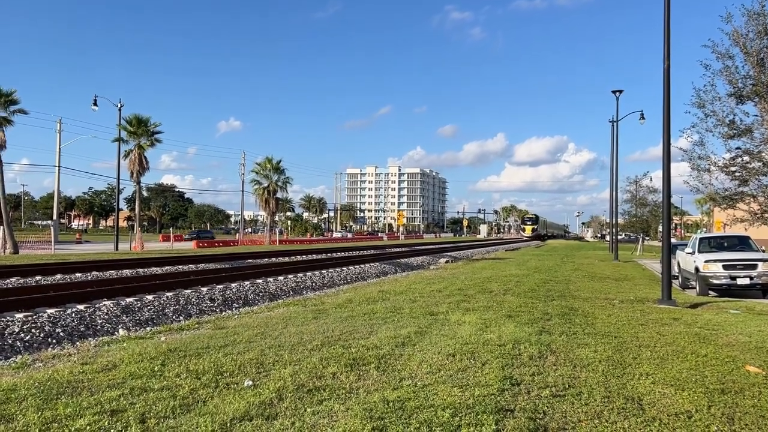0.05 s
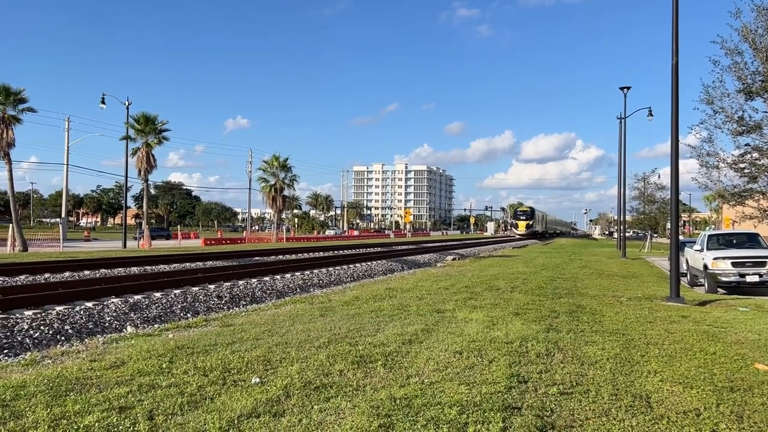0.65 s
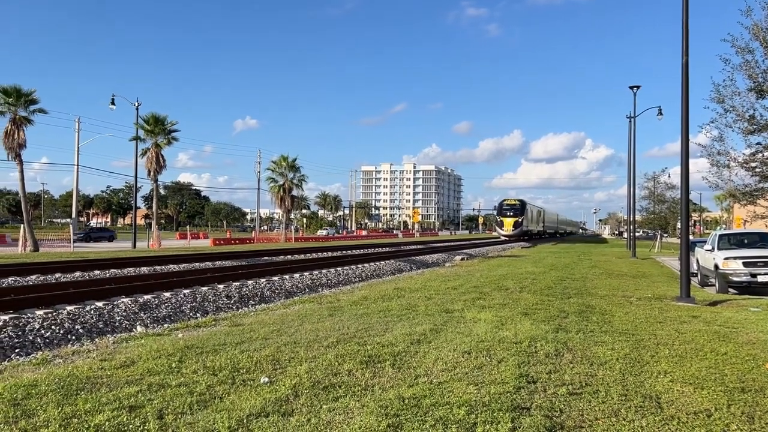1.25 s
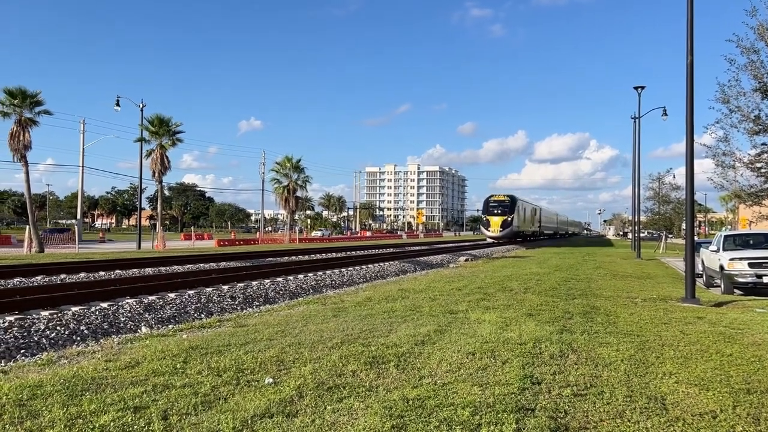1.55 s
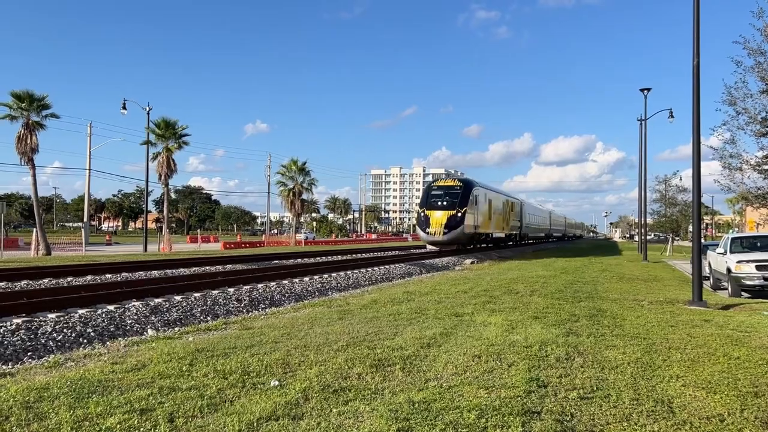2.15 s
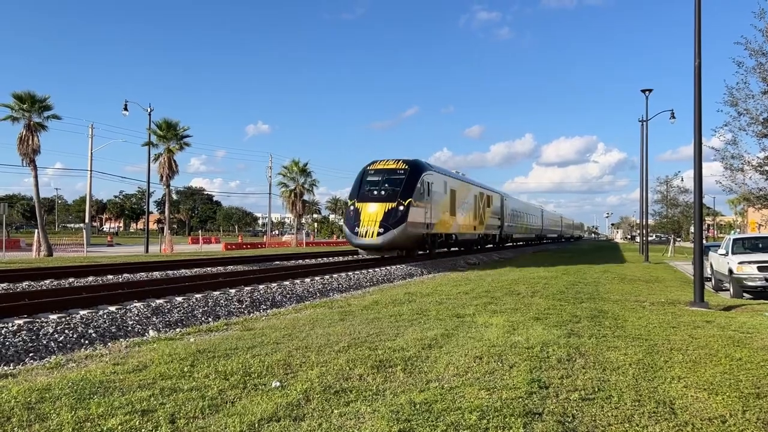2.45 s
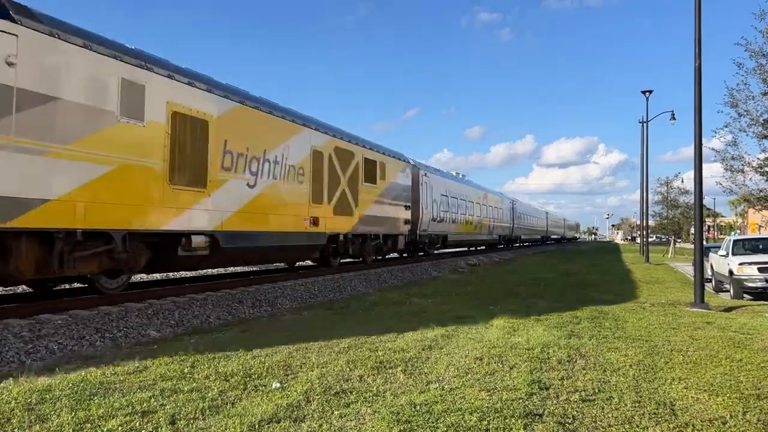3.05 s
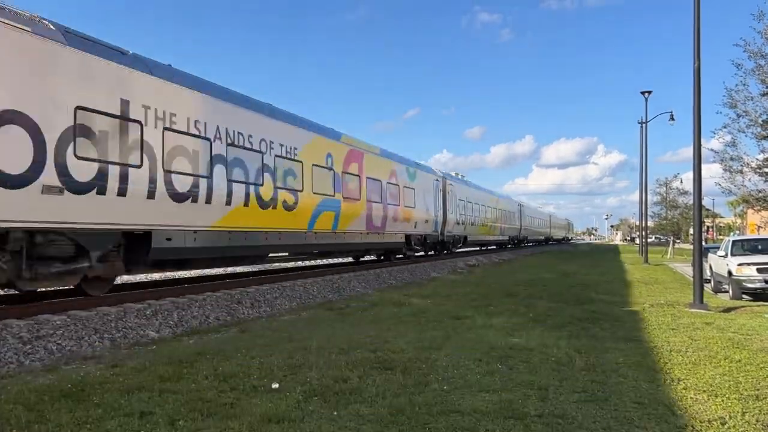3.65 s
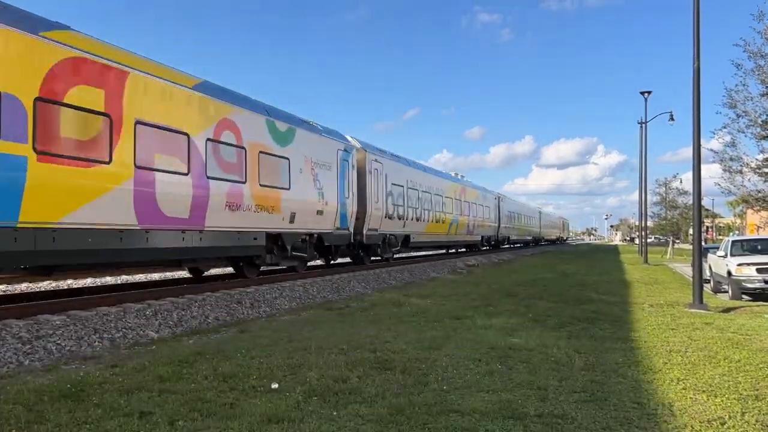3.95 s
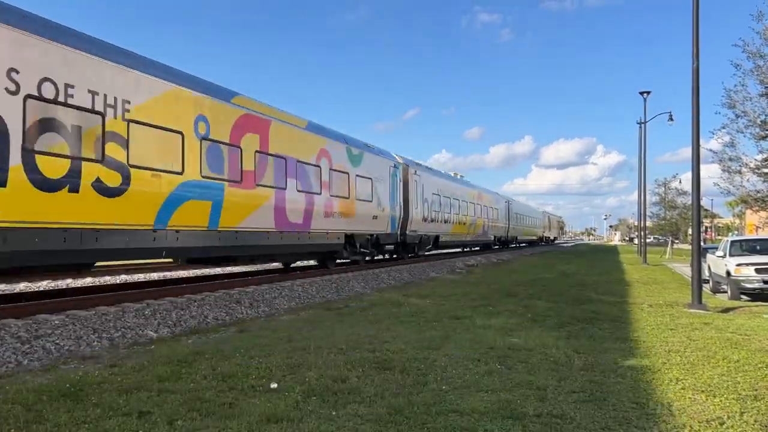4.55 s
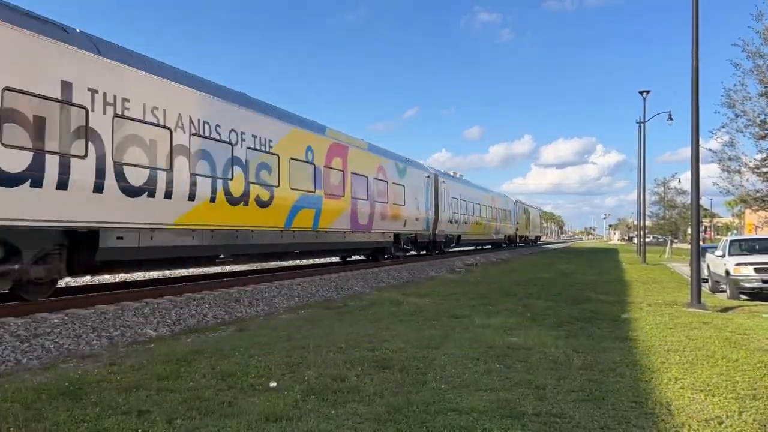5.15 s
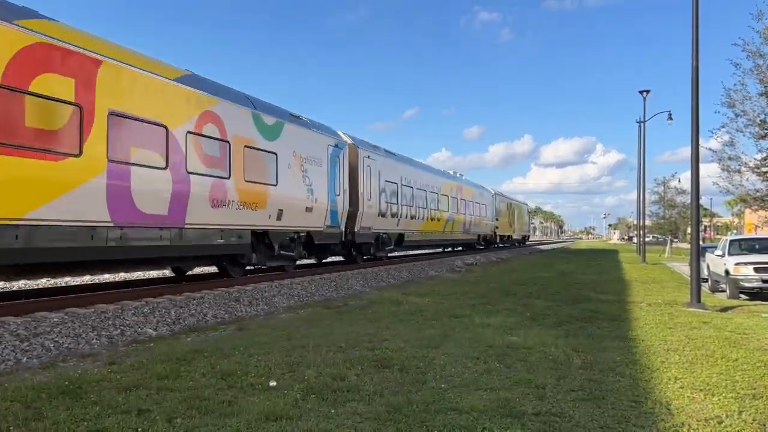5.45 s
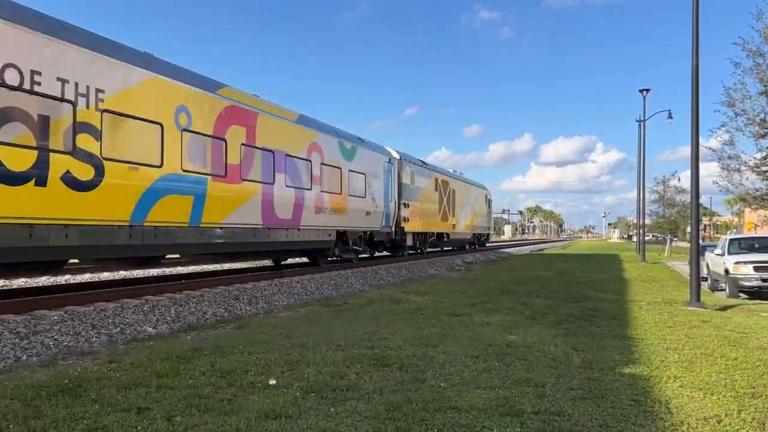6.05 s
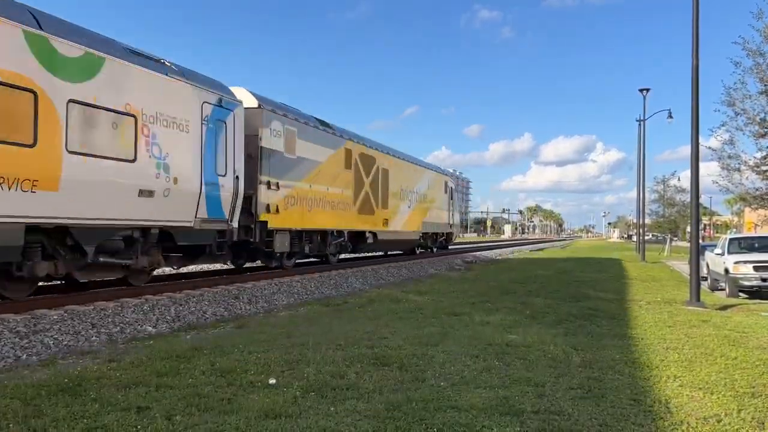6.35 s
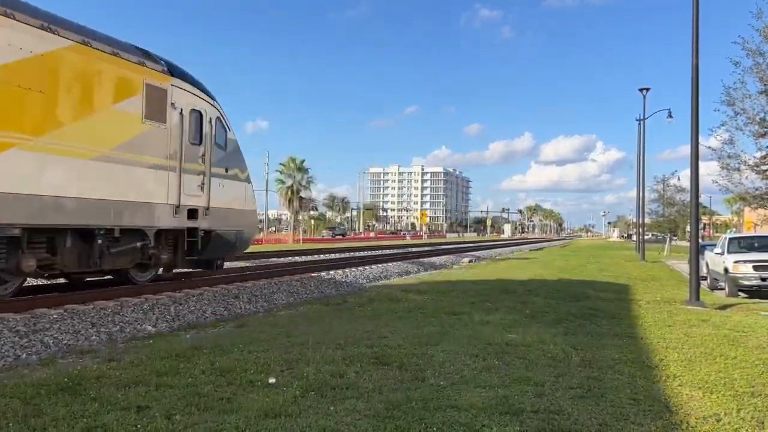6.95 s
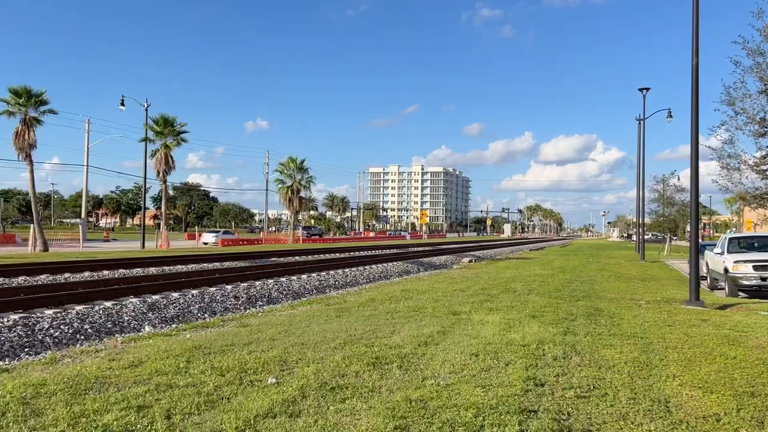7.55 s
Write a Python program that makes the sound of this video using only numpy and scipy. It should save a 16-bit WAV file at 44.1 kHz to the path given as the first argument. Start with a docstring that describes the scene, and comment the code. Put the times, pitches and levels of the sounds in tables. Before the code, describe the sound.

From the start, the rails carry a hollow singing tone with a light pulse and a thin, high sizzle, while a diesel engine drones in the distance. A warning bell clangs six times, about every 0.6 seconds, growing louder as the train nears. At about 3 seconds the leading locomotive roars past close by, the loudest moment, with a deep throbbing rumble, a knock and a fan hum that drops in pitch. From about 3.5 to 6.5 seconds the coaches follow, their steel wheels rushing in gentle swells, with ringing tones, a whine in the rails and brief metallic squeals. Near 7 seconds the rear locomotive passes more quietly, its engine and fan notes sliding down. The rush then fades, and the rails keep ringing until the end, just before 8 seconds. Everything is heard in stereo, in the open air beside the track.

```python
"""A diesel passenger train, four coaches between two locomotives, rushes past a stereo microphone.
First the rails sing and sizzle, the engine drones and a warning bell clangs closer and closer.
At about 3 seconds the first locomotive roars by, its cooling fans dropping in pitch as they pass.
Then the coaches follow, their steel wheels rushing, ringing and squealing on the rough rails.
Near 7 seconds the second locomotive passes, more quietly, and the rails ring on behind it."""
import sys
import numpy as np
from scipy import signal
from scipy.fft import rfft, irfft, next_fast_len
from scipy.io import wavfile
from scipy.ndimage import uniform_filter1d, minimum_filter1d

SR = 44100
rng = np.random.default_rng(int(sys.argv[2]) if len(sys.argv) > 2 else 0)


def bounce(signal):
    """Save signal as a 16-bit WAV file at the path given by the first command-line argument."""
    frames = np.transpose(np.atleast_2d(signal))
    limited = np.clip(frames, -1, 1)
    pcm = np.round(limited * 32767).astype(np.int16)
    wavfile.write(sys.argv[1], SR, pcm)


N = 343098
TIME, BINS = np.arange(N) / SR, np.fft.rfftfreq(next_fast_len(N), 1 / SR)
TRAIN_M_PER_S, SOUND_M_PER_S, TRACK_DISTANCE_M = 34, 343, 9
WHEEL_TURN_HZ, THROB_HZ = 10.35, 10.7

# The coaches' air conditioners. Each row: time in seconds, level in dB.
VENT_LEVEL = [(3.4, -63), (3.9, -42), (5, -40), (6.4, -43), (7.78, -44)]
# Four sounds in the rails. Each row: time in seconds, level in dB.
WHINE_LEVEL = [(3.2, -53), (3.65, -29.5), (4.35, -23.5), (4.75, -34), (5.6, -40), (6.05, -31), (6.9, -38),
               (7.6, -55)]
SONG_LEVEL = [(0, -29.5), (1.9, -24.5), (3, -25), (3.6, -35.5), (7.78, -67)]
SIZZLE_LEVEL = [(0, -45.5), (2.8, -42.5), (3.7, -52), (7, -53.5), (7.78, -70)]
RING_LEVEL = [(0, -70), (4.5, -54), (6, -35.5), (7, -38), (7.78, -45.5)]
# The tone colour of each noise. Each row: frequency in Hz, relative level in dB.
SONG_SPECTRUM = [(500, -39), (680, -53), (800, -13), (900, -32), (1000, -3.5), (1150, 0), (1228, -0.5),
                 (1300, -4.5), (1420, -1.5), (1520, -40), (1700, -53)]
SIZZLE_SPECTRUM = [(7000, -57), (9000, -89), (10900, 28.5), (11600, 24.5), (12200, 13.5), (13200, 23.5),
                   (14200, 16.5), (15500, 8), (17000, -43)]
RING_SPECTRUM = [(2500, -27), (2800, 6), (3250, 0), (3700, -6), (4000, -32)]
CLAPPER_SPECTRUM = [(1650, 0), (2100, -1), (2700, -3), (3300, -3), (4600, -19)]
EXHAUST_SPECTRUM = [(12, -40), (25, -23), (38, -14), (48, -8), (60, 1.5), (85, 1.5), (110, -4), (140, -8),
                    (200, -25), (300, -50)]
ROAR_SPECTRUM = [(70, -42), (110, -1), (150, -3), (190, 1), (330, -2.5), (420, -1.5), (550, -6),
                 (700, -3.5), (930, -1), (1200, -9.5), (1600, -6.5), (4000, -45)]
ROLLING_SPECTRUM = [(400, -35), (600, -5), (800, 0), (1000, 1), (1350, 3.5), (1600, 1), (2100, -1.5),
                    (2600, -10), (3000, -10), (3270, -15), (3550, -12), (4100, -14.5), (4400, -13.5),
                    (4800, -14), (5450, -17.5), (5800, -19), (6800, -24), (8500, -22.5), (12000, -71.5),
                    (15000, -64)]
# Notes that a wheel taps out of the rail. Each row: pitch in Hz, relative level in dB.
TAP_NOTES = [(1238, 0), (1202, -7.5)]
# Steady notes as the train approaches: the locomotive's drone and the rails singing above it.
# Each row: pitch in Hz, blur in Hz, relative level in dB.
APPROACH_NOTES = [(276, 8.9, -1), (626.5, 23, -5), (811, 18, -3.5), (993, 8.8, -3), (1100, 14, -5.5),
                  (1352, 18, -16)]
# They fade once the nose is past. Each row: time in seconds, their level in dB, blower level in dB.
APPROACH_LEVEL = [(0, -41.5, -68), (1, -39, -49), (1.5, -34.5, -31.5), (2.1, -31, -34), (3.05, -24.5, -29),
                  (3.4, -73, -74)]
# Each engine's deep note. Each row: passing time in seconds, pitch at rest in Hz, level in dB,
# beats per second, time of one beat's peak in seconds.
ENGINE_NOTES = [(3.45, 60, -26, 4.55, 3.43), (7.17, 60, -30.5, 4.85, 6.75)]
# Notes beamed sideways by fans and wheels. Each row: passing time in seconds, loudest time in seconds,
# pitch at rest in Hz, level in dB.
FAN_NOTES = [(3.3, 3.12, 251, -23), (3.62, 3.6, 251, -26), (6.82, 6.85, 260, -27), (7.25, 7.33, 260, -24)]
WHEEL_NOTES = [(3.0, 2.97, 967, -17.5), (3.85, 3.61, 1290, -29), (3.85, 3.82, 4000, -38),
               (4.25, 4.5, 3680, -37.5), (4.6, 4.54, 2680, -37.5), (4.58, 4.42, 1275, -25),
               (4.62, 4.64, 1970, -27), (5.45, 5.12, 4400, -39), (5.15, 5.23, 3620, -39.5),
               (5.15, 4.87, 1270, -30.5), (4.85, 5.12, 2620, -37), (5.65, 5.63, 1019, -28),
               (5.87, 5.75, 2380, -33), (6.6, 5.83, 1500, -31), (6.15, 6.02, 4330, -39),
               (5.8, 6.55, 4380, -42.5), (5.9, 6.55, 3560, -42), (8.7, 6.62, 3200, -40),
               (6.85, 7.2, 1300, -35.5)]
# Strokes of the bell. Each row: start in seconds, level at the track's distance in dB, extra clang in dB.
BELL_STROKES = [(.19, -34, -5.5), (.81, -29.5, -4), (1.43, -28, 1), (2.065, -19.8, -3), (2.68, -23, 8.5),
                (3.3, -31, -4)]
# The bell's long ring and short clang, head-on. Each row: pitch in Hz, relative level in dB,
# seconds to fade by 60 dB.
BELL_RING = [(1712, 2, 0.81), (1919, 3.5, 2.1), (3162, -4.5, 0.9), (4580, -6, .9)]
BELL_CLANG = [(1740, 7, 0.45), (1820, -1, .3), (1880, 6, 0.44), (1930, 0, 0.39), (3130, -1, 0.2)]
# Knocks, scrapes and gusts, then brief metallic tones. Each row: time of the peak in seconds,
# centre frequency in Hz, half the length in seconds, level in dB.
JOLTS = [(3.256, 780, .025, -14), (3.442, 3600, .05, -33), (3.42, 680, 0.3, -24.5),
         (3.566, 650, .07, -21.5), (4.5, 104, .3, -37.5), (4.477, 2900, 0.073, -33),
         (5.932, 250, 0.23, -34.5), (6.05, 640, 0.34, -30.5), (6.65, 540, .45, -33)]
METAL_TONES = [(3.42, 1630, .08, -27), (3.605, 1358, 0.079, -19), (3.9, 2210, 0.088, -30),
               (4.395, 2090, 0.11, -24), (4.77, 1870, 0.097, -30), (4.776, 4345, 0.044, -33),
               (5.338, 4330, 0.08, -40.5), (5.389, 2110, 0.07, -23), (5.6, 2534, 0.1, -32),
               (5.87, 4400, .07, -35), (5.918, 2310, 0.039, -26), (6.123, 2330, 0.054, -29),
               (6.18, 1306, .09, -31), (6.41, 2575, .05, -35), (6.619, 2430, 0.033, -24),
               (6.63, 3520, .05, -40), (7.605, 3260, .22, -47)]
# The locomotives. Each row: passing time in seconds, exhaust level in dB, roar level in dB,
# how steeply the sound fades with distance once past.
LOCOMOTIVES = [(3.0, -19, -14, 1.58), (6.85, -31.5, -27, 1.24)]
# The sets of wheels. Each row: passing time in seconds, rolling level in dB, share of the ringing in dB.
WHEEL_SETS = [(2.87, -18, -8), (3.15, -20, -11.5), (3.55, -18, -4.5), (4.4, -19, -1), (5.15, -20, 0),
              (5.87, -21, 0), (6.55, -23, -0.5), (7.1, -28.5, -2.5)]
# The resonances of a wheel at rest. Each row: pitch in Hz, width in Hz, relative level in dB.
WHEEL_RESONANCES = [(1024, 43, 4.5), (1420, 33, -5), (1956, 40, 3.5), (2390, 41, 0.5), (2752, 45, -2.5),
                    (3415, 41, -3), (4200, 160, -10), (6000, 260, -13.5), (6410, 100, -16)]
# What air and ground do to the sound. Each row: time in seconds, treble slope in dB per octave
# above 2 kHz, depth of the ground's notch in dB.
SOUND_PATH = [(0, -3.5, 10), (1.5, 0.5, 8), (2.6, -0.5, 0), (3.8, 0.5, 7.5), (6.3, 0, 1), (7.78, 4.5, 4)]
# Where the train is. Each row: time in seconds, direction (0 ahead, 1 alongside, 2 behind).
DIRECTION = [(0, 0), (1.9, 0), (2.9, .75), (4, 1), (6.5, 1), (7.5, 1.7)]
# How alike left and right are, from 0 to 1. Each row: frequency in Hz, train ahead, train alongside.
STEREO_LIKENESS = [(60, .99, .99), (160, .97, .94), (300, .84, .8), (560, .45, .7), (780, .55, .85),
                   (950, .55, .72), (1220, .95, .66), (1600, .5, .35), (2500, .78, .7), (3500, .3, .3),
                   (5600, .25, .2), (7200, .6, .6), (9500, .97, .93), (15000, .97, .97)]
# How far left leads right. Each row: frequency in Hz, lead in radians, extra radians when alongside.
STEREO_PHASE = [(50, 0, 0), (170, -.1, .45), (330, -.5, 1.3), (520, 0, 1.2), (750, 1.7, .35),
                (1200, 2.3, -.05), (1500, 3.7, 0), (1900, 4.1, 0), (2500, 6.3, 0), (3100, 7.3, .9),
                (5000, 7, .4), (7600, 6.3, 0), (9300, 3.3, 0), (10900, 3.1, 0), (12400, 0, 0)]
# The balance with the train alongside. Each row: frequency in Hz, left minus right in dB.
STEREO_BALANCE = [(60, 1), (250, 0.5), (380, 3), (700, 2), (980, 4), (1250, 0.5), (1600, 1.5), (1900, -1),
                  (3200, 1.5), (4200, 2.5), (5300, 6.5), (7500, 1.5), (11000, -1.5)]


def amp(db):
    """Turns decibels into a gain."""
    return 10 ** (np.asarray(db) / 20)


def unit(x):
    """Scales a signal to an average power of 1."""
    return x / np.sqrt(np.mean(abs(x) ** 2) + 1e-20)


def over_time(rows, t=TIME):
    """Joins a table's points with straight lines in time."""
    times, *columns = np.transpose(rows)
    return np.squeeze([np.interp(t, times, column) for column in columns])


def over_pitch(rows, hz=BINS):
    """Joins a table's points with straight lines on a log frequency scale."""
    row_hz, *columns = np.transpose(rows)
    return np.squeeze([np.interp(np.log(hz + 1), np.log(row_hz + 1), column) for column in columns])


def noise(gain):
    """Two unrelated noises of power 1, shaped by a gain for each frequency."""
    real, imaginary = rng.standard_normal((2, 2, len(BINS)))
    return unit(irfft((real + 1j * imaginary) * gain)[:, :N])


def band(spectrum):
    """Noise that follows a spectrum table and falls away steeply past both ends."""
    low_hz, high_hz = spectrum[0][0], spectrum[-1][0]
    edges = 1 / (1 + (BINS / high_hz) ** 8) / (1 + (low_hz / (BINS + 1)) ** 4)
    return noise(amp(over_pitch(spectrum)) * edges)


def resonance(hz, width_hz):
    """A gain for each frequency, with one rounded peak."""
    return 1 / (1 + ((BINS - hz) / width_hz) ** 2)


def drift(rate_hz):
    """A smooth random wobble of power 1."""
    hz = np.fft.rfftfreq(8192, 1 / 1000)
    slow = irfft(rfft(rng.standard_normal(8192)) * np.exp(-(hz / rate_hz) ** 2))
    return unit(np.interp(TIME, np.arange(len(slow)) / 1000, slow))


def wander(blur_hz, waver):
    """Random changes of strength and phase that blur a tone."""
    return unit(1 + waver * (drift(blur_hz) + 1j * drift(blur_hz)))


def fuzzy_tone(hz, blur_hz, clock, waver):
    """A wavering tone; a clock that runs fast or slow bends its pitch (the Doppler effect)."""
    return np.sqrt(2) * (wander(blur_hz, waver) * np.exp(2j * np.pi * (hz * clock + rng.random()))).real


def travel(pass_s):
    """When the sound now heard left its source (0 as it passes), and how near that was (1 at closest)."""
    sent = np.arange(-10, 10, .01)
    metres = np.hypot(TRAIN_M_PER_S * sent, TRACK_DISTANCE_M)
    heard = pass_s + sent + (metres - TRACK_DISTANCE_M) / SOUND_M_PER_S
    return np.interp(TIME, heard, sent), np.interp(TIME, heard, TRACK_DISTANCE_M / metres)


def passing_power(pass_s, db, rise, fall):
    """A source swells as it nears and fades as it leaves; rise and fall set how steeply."""
    sent, near = travel(pass_s)
    return (amp(db) * near ** np.where(sent < 0, rise, fall)) ** 2


def fly_by(rows, focus, blur_hz, waver):
    """Each note drops in pitch as its source passes and swells as its beam sweeps by."""
    out = np.zeros(N)
    for pass_s, loudest_s, hz, db in rows:
        aim = 1 / np.sqrt(1 + (TRAIN_M_PER_S * (TIME - loudest_s) / TRACK_DISTANCE_M) ** 2)
        out += amp(db) * aim ** focus * fuzzy_tone(hz, blur_hz, travel(pass_s)[0], waver)
    return out


def vents():
    """The air conditioners along the coaches make a fuzzy hum."""
    return noise(resonance(hz=412.6, width_hz=16)) * amp(over_time(VENT_LEVEL))


def rail_whine():
    """The rail rings under the coaches; it stands still, so its pitch holds."""
    return noise(resonance(hz=1370, width_hz=28)) * amp(over_time(WHINE_LEVEL))


def rails(contact, shimmer_db=2.5, under_wheels_db=-28):
    """The rails carry a hollow song and thin sizzle far ahead, sizzle under the wheels, then ring on."""
    song = band(SONG_SPECTRUM) * amp(over_time(SONG_LEVEL) + shimmer_db * drift(23))
    sizzle_gain = np.hypot(amp(over_time(SIZZLE_LEVEL)), amp(under_wheels_db) * contact) * amp(drift(20))
    sizzle = band(SIZZLE_SPECTRUM) * sizzle_gain
    return song + sizzle + band(RING_SPECTRUM) * amp(over_time(RING_LEVEL))


def rail_taps(first_s=.057, rise_s=.01, decay_s=.035, swell_s=.84, crest_s=1.04):
    """A rough spot on a wheel sets the rail ringing once a turn; the ring slowly swells and sinks."""
    age = (TIME - first_s) % (1 / WHEEL_TURN_HZ)
    taps = unit(.15 + 2 * (1 - np.exp(-age / rise_s)) * np.exp(-age / decay_s))
    notes = sum(amp(db) * fuzzy_tone(hz, 24, TIME, waver=.55) for hz, db in TAP_NOTES)
    swell_db = 2.5 * np.cos(2 * np.pi * (TIME - crest_s) / swell_s)
    return amp(over_time(SONG_LEVEL) + swell_db) * taps * notes


def approach_notes(blower_hz=461, waver=1.4):
    """Steady notes as the train nears: the locomotive's drone and blower, and the rails singing above."""
    notes_db, blower_db = over_time(APPROACH_LEVEL)
    notes = sum(amp(db) * fuzzy_tone(hz, blur_hz, TIME, waver) for hz, blur_hz, db in APPROACH_NOTES)
    return amp(notes_db) * notes + amp(blower_db) * fuzzy_tone(blower_hz, 19.5, TIME, waver)


def engines(beat_db=4):
    """The deep firing note of each engine beats slowly as it goes by."""
    out = np.zeros(N)
    for pass_s, hz, db, beat_hz, crest_s in ENGINE_NOTES:
        sent, near = travel(pass_s)
        beat = np.cos(2 * np.pi * beat_hz * (TIME - crest_s))
        out += amp(db + beat_db * beat) * near ** 1.3 * fuzzy_tone(hz, 10, sent, waver=.5)
    return out


def fans(throb_db=2.5):
    """Two cooling fans on each locomotive hum nearly clean notes, throbbing at the engines' pace."""
    throb = np.sin(2 * np.pi * THROB_HZ * TIME + drift(2))
    return fly_by(FAN_NOTES, focus=2.6, blur_hz=12, waver=.35) * amp(throb_db * throb)


def bell(pass_s=3.2, rise_s=.016, clapper_db=1, clapper_fade_s=.7, blur_hz=32):
    """A clapper strikes the first locomotive's bell; swirling air makes its notes waver."""
    sent, near = travel(pass_s)
    clock = sent * (1 - TRAIN_M_PER_S / SOUND_M_PER_S)  # the listed pitches are already raised
    starts, level_db, clang_db = np.transpose(BELL_STROKES)
    latest = np.maximum(np.searchsorted(starts, TIME) - 1, 0)
    age = np.maximum(TIME - starts[latest], 0)
    out = band(CLAPPER_SPECTRUM)[0] * amp(level_db[latest] + clapper_db - 60 * age / clapper_fade_s)
    for notes, stroke_db in (BELL_RING, level_db), (BELL_CLANG, level_db + clang_db):
        for hz, db, fade_s in notes:
            tone = fuzzy_tone(hz, blur_hz, clock, waver=.85)
            out += amp(stroke_db[latest] + db - 60 * age / fade_s) * tone
    return np.sqrt(2) * out * near * (1 - np.exp(-age / rise_s))


def jolts(edge_ratio=1.34):
    """Rough parts under the train go by with brief bursts of noise, about an octave wide."""
    out = np.zeros((2, N))
    for peak_s, hz, half_s, db in JOLTS:
        during = abs(TIME - peak_s) < half_s
        bandpass = signal.butter(2, [hz / edge_ratio, hz * edge_ratio], "bandpass", fs=SR, output="sos")
        burst = unit(signal.sosfilt(bandpass, rng.standard_normal((2, SR))))[:, :during.sum()]
        out[:, during] += amp(db) * np.cos(np.pi / 2 * (TIME[during] - peak_s) / half_s) ** 2 * burst
    return out


def metal_tones():
    """Brief metallic tones: the passing bell's lowered ring, then squeals of slipping wheels."""
    unsteady = wander(blur_hz=90, waver=1.4)
    out = np.zeros(N)
    for peak_s, hz, half_s, db in METAL_TONES:
        during = abs(TIME - peak_s) < half_s
        t = TIME[during] - peak_s
        tone = (unsteady[during] * np.exp(2j * np.pi * (hz * t + rng.random()))).real
        out[during] += np.sqrt(2) * amp(db) * np.cos(np.pi / 2 * t / half_s) ** 2 * tone
    return out


def singing_wheels():
    """Single wheels hold a metallic note while they pass."""
    return fly_by(WHEEL_NOTES, focus=3.2, blur_hz=62, waver=1.3)


def wheel_contact():
    """How strong the rolling is: one swell for each wheel set, spread over some metres of rail."""
    power = sum(passing_power(pass_s, db, rise=1.196, fall=1.94) for pass_s, db, _ in WHEEL_SETS)
    return np.sqrt(uniform_filter1d(power, size=17000))


def wheel_ring(detune=.011):
    """Rough rail rings each wheel set; its notes glide down as it passes and the next takes over."""
    ring, power = np.zeros((2, N)), np.zeros(N)
    for pass_s, _, share_db in WHEEL_SETS:
        tunings = 1 + detune * rng.standard_normal(len(WHEEL_RESONANCES))
        at_rest = noise(sum(amp(db) * resonance(hz * tuning, width_hz)
                            for (hz, width_hz, db), tuning in zip(WHEEL_RESONANCES, tunings)))
        sent, near = travel(pass_s)
        position = (sent - sent[0]) * SR % (N - 1)  # read faster when coming, slower when leaving
        ring += amp(share_db) * near * np.array([np.interp(position, np.arange(N), x) for x in at_rest])
        power += near ** 2
    return ring / np.sqrt(power)


def rolling(contact, ring_db=-7, patchy_db=2):
    """Steel rushes on steel and the wheels ring, pulsing gently with each turn."""
    rush = band(ROLLING_SPECTRUM) + amp(ring_db) * wheel_ring()
    hz, t, spectra = signal.stft(rush, SR, nperseg=512)
    # The treble tilts over time: duller while the train is far ahead, brighter as it rolls away.
    treble_db = np.outer(np.log2(np.maximum(hz / 2000, 1)), over_time(SOUND_PATH, t)[0])
    # Unevenly rough rail makes narrow bands flare and fade.
    patches = uniform_filter1d(rng.standard_normal(spectra.shape[1:]), size=3, axis=0)
    patches = unit(uniform_filter1d(patches, size=22, axis=1))
    rush = signal.istft(spectra * amp(treble_db + patchy_db * patches), SR, nperseg=512)[1][:, :N]
    turn = 2 * np.pi * WHEEL_TURN_HZ * TIME + drift(1)
    flutter_db = .6 * np.cos(turn) + .4 * np.cos(2 * turn)
    return rush * contact * amp(flutter_db)


def exhaust(contact, rise=.37, coaches_db=-15, beat_hz=4.55):
    """The deep diesel rumble carries far ahead, throbbing and beating; the coaches rumble less."""
    rumble = band(EXHAUST_SPECTRUM)
    rumble /= np.sqrt(uniform_filter1d(rumble ** 2, size=4000, axis=1))  # even out chance swells
    throb_db = 1.5 * np.sin(2 * np.pi * THROB_HZ * TIME + drift(2))
    surge_db = .5 * drift(8)
    beat_db = 1.1 * np.cos(2 * np.pi * beat_hz * (TIME - .105))
    power = sum(passing_power(pass_s, db, rise, fall) for pass_s, db, _, fall in LOCOMOTIVES)
    power += (amp(coaches_db) * contact) ** 2
    return rumble * np.sqrt(power) * amp(throb_db + beat_db + surge_db)


def roar(contact, rise=.89, coaches_db=-11, gust_db=1.5):
    """Machinery and torn air roar loudest at the first locomotive, with a gust at each wheel set."""
    power = sum(passing_power(pass_s, db, rise, fall) for pass_s, _, db, fall in LOCOMOTIVES)
    power += (amp(coaches_db) * contact) ** 2
    return band(ROAR_SPECTRUM) * np.sqrt(power) * amp(gust_db * drift(45))


def ground(x, notch_hz=1560, width_hz=115):
    """Sound bouncing off the ground cancels a narrow band, most deeply while the train is far ahead."""
    hz, t, spectra = signal.stft(x, SR, nperseg=1024)
    notch_db = np.outer(np.exp(-((hz - notch_hz) / width_hz) ** 2), over_time(SOUND_PATH, t)[1])
    return signal.istft(spectra * amp(-notch_db), SR, nperseg=1024)[1][:, :N]


def microphone(wide, points):
    """Wide sources reach the two sides partly alike, small ones alike; phase and balance then shift."""
    hz, t, (one, other, point) = signal.stft(np.vstack([wide, points]), SR, nperseg=2048, noverlap=1536)
    direction = over_time(DIRECTION, t)
    beside = np.clip(direction, 0, 1)
    alike = np.clip(over_pitch(STEREO_LIKENESS, hz).T @ np.array([1 - beside, beside]), 0, 1)
    lead, extra_lead = over_pitch(STEREO_PHASE, hz)
    lag = np.exp(-1j * (lead[:, None] + np.outer(extra_lead, direction)))
    balance = amp(np.outer(over_pitch(STEREO_BALANCE, hz), .5 + .5 * direction))
    left = (one + point) * balance
    right = (alike * one + np.sqrt(1 - alike ** 2) * other + point) * lag
    pair = np.array([left, right]) * np.sqrt(2 / (1 + balance ** 2))
    return signal.istft(pair, SR, nperseg=2048, noverlap=1536)[1][:, :N]


def scene():
    """The whole train in open air; the ground scatters bell and wheel notes differently to each side."""
    contact = wheel_contact()
    scattered = np.array([bell() + metal_tones() + singing_wheels() for _ in range(2)])
    rush = exhaust(contact) + ground(roar(contact) + rolling(contact))
    details = rails(contact) + rail_whine() + vents() + jolts()
    points = fans() + engines() + approach_notes() + rail_taps()
    return microphone(rush + details + scattered, points)


def record(dry, cutoff_hz=15600):
    """A smooth limiter turns peaks down to full scale, then a filter removes the highest treble."""
    needed_gain = 1 / np.maximum(abs(dry).max(axis=0), 1)
    gain = uniform_filter1d(minimum_filter1d(needed_gain, size=301), size=301)
    lowpass = signal.firwin(511, cutoff_hz, window=("kaiser", 9), fs=SR)
    return signal.oaconvolve(dry * gain, lowpass[None], "same")


dry = scene()
out = record(dry)
bounce(out)
```